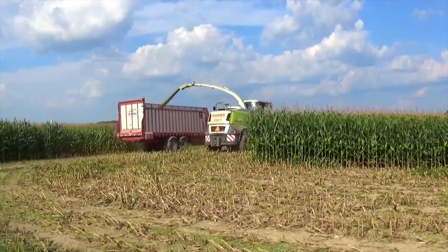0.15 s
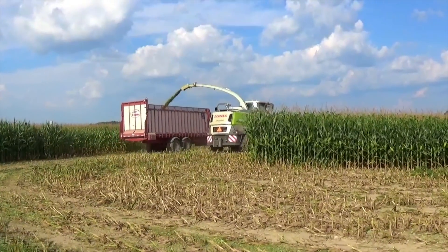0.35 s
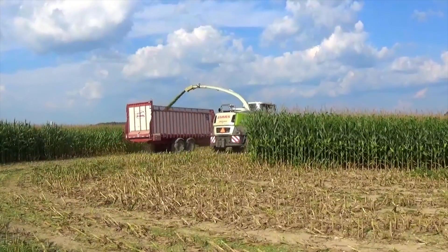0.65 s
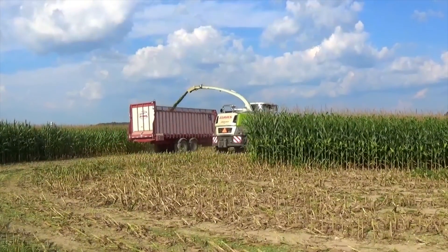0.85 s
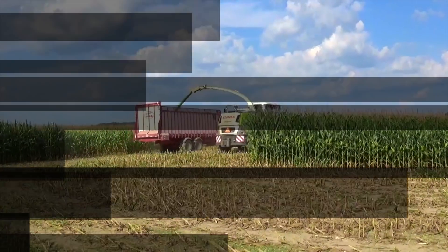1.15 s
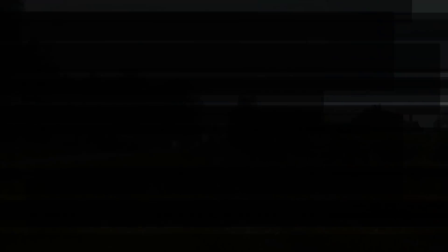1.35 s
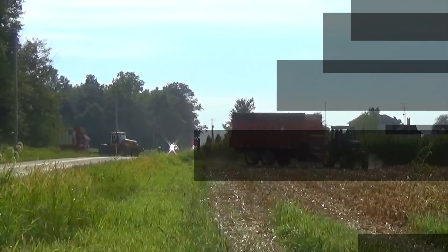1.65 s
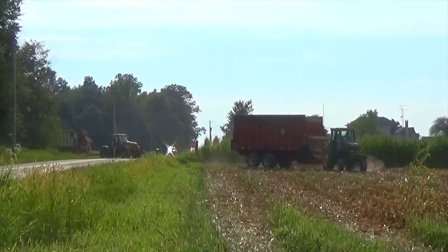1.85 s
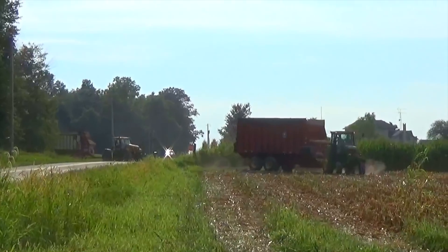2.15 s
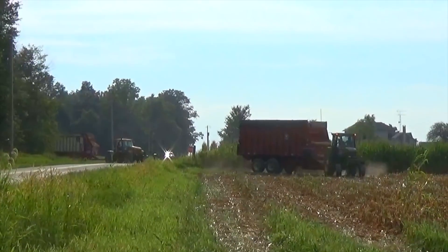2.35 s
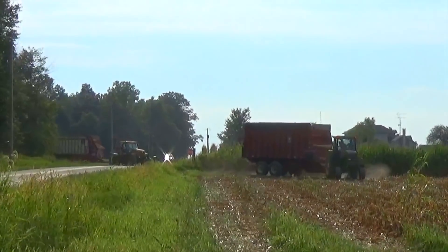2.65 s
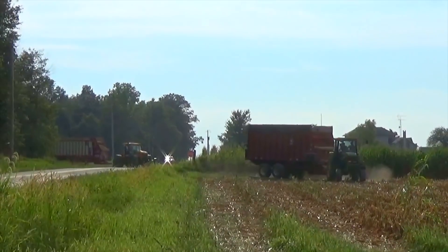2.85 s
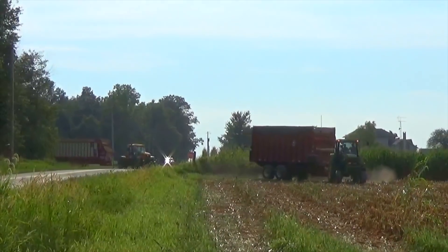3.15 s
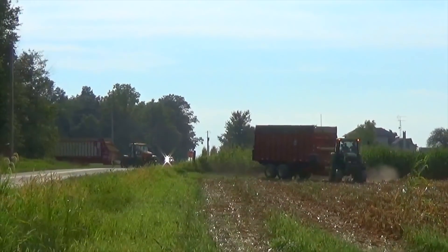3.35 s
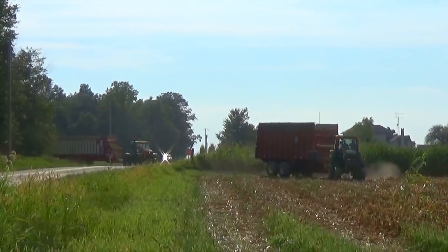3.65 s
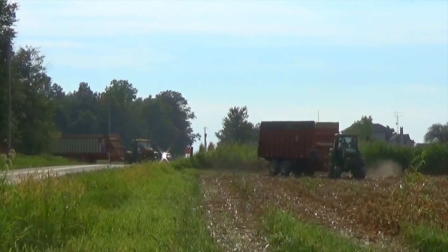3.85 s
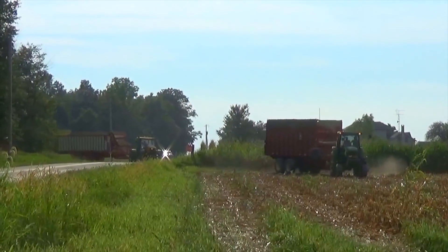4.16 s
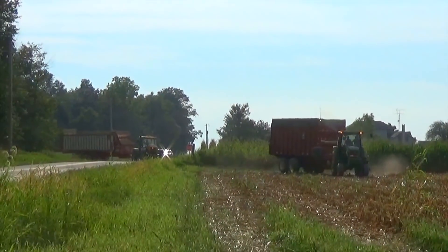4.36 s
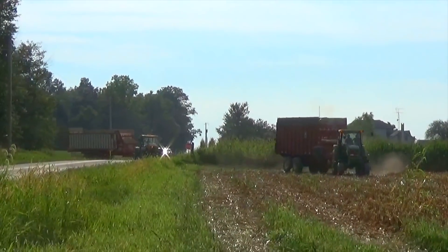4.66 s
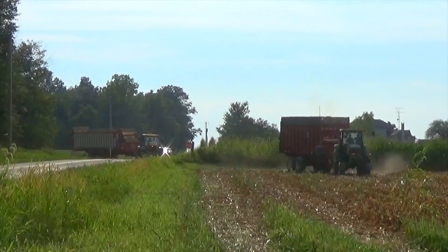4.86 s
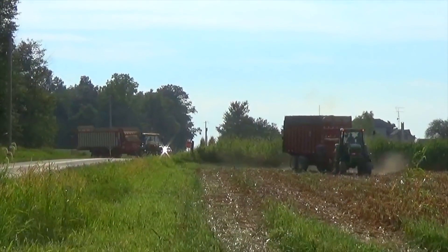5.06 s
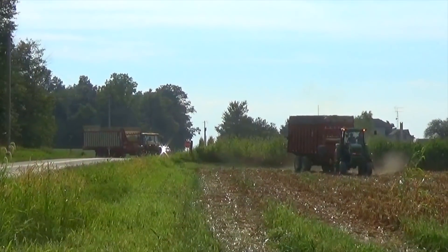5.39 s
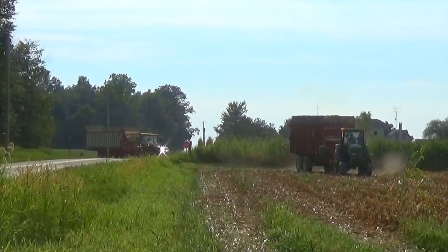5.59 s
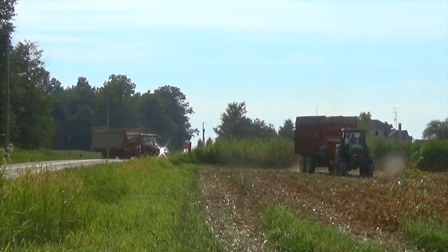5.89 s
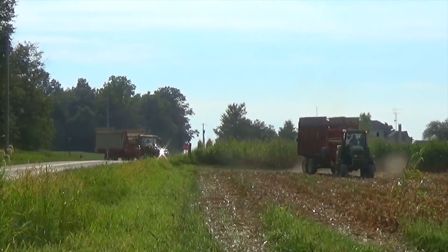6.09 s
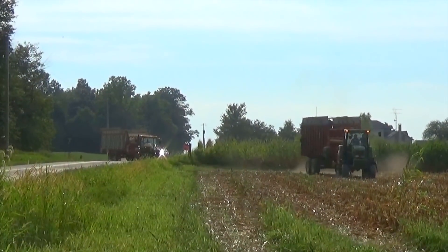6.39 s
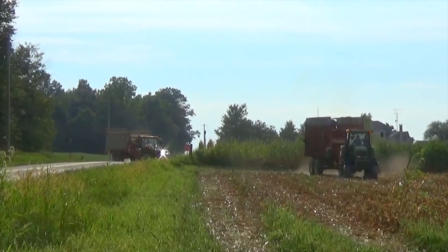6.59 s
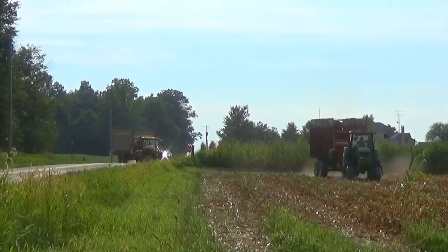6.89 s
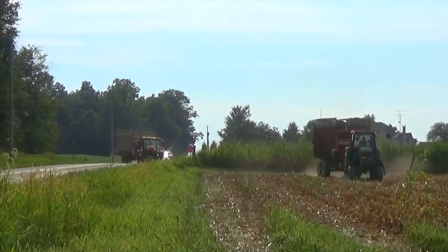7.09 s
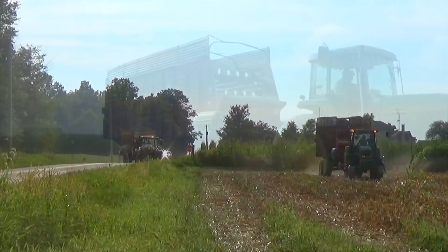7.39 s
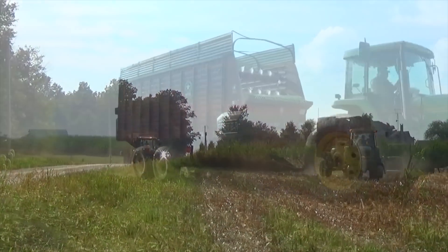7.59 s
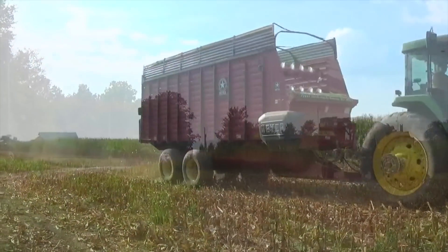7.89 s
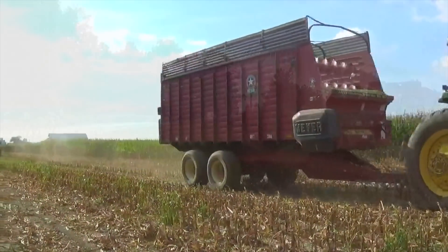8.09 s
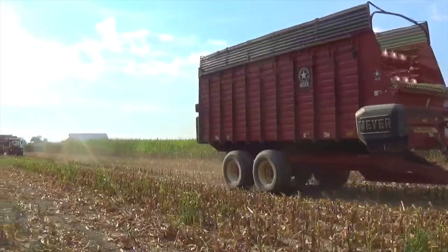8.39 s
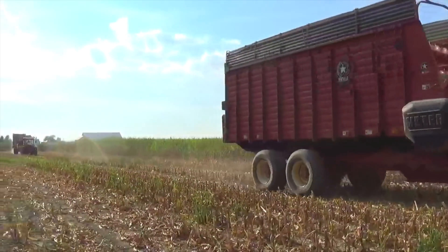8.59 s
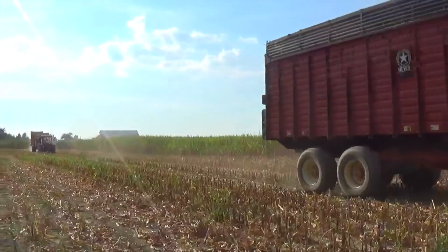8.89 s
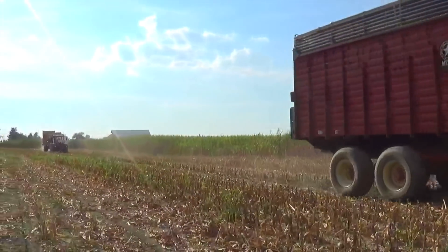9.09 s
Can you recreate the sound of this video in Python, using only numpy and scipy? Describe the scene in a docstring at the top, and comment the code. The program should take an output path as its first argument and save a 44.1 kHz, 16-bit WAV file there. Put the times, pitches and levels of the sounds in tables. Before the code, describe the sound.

From 0 to about 1 s a forage harvester fills the air: a loud, dense drum roar, tonal knife and engine hum, and bright hissing crop. It crossfades until 1.8 s into a much quieter open field with high, continuous insect rasping and low far-off tractor drones. Around 1.9-2.0 s a rapid cluster of hard, sharp clacks sounds close by, followed by tiny squeaks; a faint hollow boom comes at 2.8 s. At 4.1 s a distant tractor opens its throttle, rising for a second with diesel knock, turbo hiss and singing fan, then holding its drone. Wagon rattles tick at 4.6-5.4 and 6.8 s. From 7.5 s a near diesel tractor fades in, passing closest around 8.15 s, leaning right; its hollow exhaust drone then strengthens. Steel rattles at 8.3 s, joints squeak at 8.5 and 9.2 s, and stubble crackles.

```python
"""Corn harvest in three views that fade into each other, with wagons clanking and squeaking along the way.
First a forage harvester: its drum roars, cut crop hisses (both filtered noise) and its engine hums in lines.
From 1 s on, a far field: sharp clacks, insects trilling, droning tractors; at 4 s one opens its throttle.
From 7.5 s on, a tractor passes close by with its wagon, then turns its droning exhaust towards the listener.
Rattles are short bursts of ringing noise; squeaks are short wavering tones."""
import sys
import numpy as np
from scipy import signal
from scipy.fft import rfft, irfft, next_fast_len
from scipy.io import wavfile
from scipy.ndimage import uniform_filter1d, map_coordinates

SR = 44100
rng = np.random.default_rng(int(sys.argv[2]) if len(sys.argv) > 2 else 0)


def unload_audio(sound):
    """Save the sound as a 16-bit wav file, at the path given as the first command line argument."""
    columns = np.transpose(np.atleast_2d(sound))
    # keep every value between -1 and 1, then stretch to whole-number steps
    steps = np.round(np.clip(columns, -1, 1) * 32767)
    wavfile.write(sys.argv[1], SR, steps.astype(np.int16))


N = 407484
T = np.arange(N) / SR  # time in seconds
EDGE_HZ = 11090  # top of the sound band

# colour of the drum's roar: (f/Hz, level/dB)
CHOP_COLOUR = [(40, -44), (90, -19), (135, -10.5), (240, -2.5), (345, -13.5), (520, -12), (600, -9.5),
               (1000, -6), (1260, -11), (1560, -10.5), (2700, -7.5), (3350, -13), (4200, -10.5),
               (6400, -18.5), (11000, -28)]
# resonances of drum housing and spout: (f/Hz, width/Hz, level over the roar/dB)
HOUSING_RESONANCES = [(243, 24, 7), (398, 18, 10), (630, 50, 6), (790, 35, 5), (930, 170, 2), (1380, 50, 5),
                      (1555, 60, 7), (1690, 110, 4), (2335, 110, 6), (2480, 90, -4), (2625, 130, 4),
                      (3900, 250, 4), (5450, 600, 3)]
# colour of the blown crop's hiss: (f/Hz, level/dB)
CROP_COLOUR = [(2000, -22), (3500, -9), (5000, -4), (6500, -3), (8000, -1), (9000, 0), (11000, -3)]
# thick wads of crop leaving the spout: (t/s, bell width/s, extra hiss level/dB)
CROP_WADS = [(.05, 0.32, 4.5), (1.32, 0.11, 4.5), (1.52, 0.22, 3.5)]
# tone of the knives: (multiple of the cutter rate, level/dB)
KNIFE_LINES = [(1, 1.5), (6, -1.5)]
# the harvester's own diesel: (multiple of the firing rate, level/dB)
CHOP_ENGINE_LINES = [(1, -1), (3, -1.5)]
CHOP_DB, CROP_DB, CUTTER_DB = -17, -27, -36  # roar, hiss, knives
CUTTER_HZ, CUTTER_SAG_HZ_PER_S2 = 268, 6.5  # the drum slows ever faster under load
BLOWER_HZ, BLOWER_DB = 245.4, -35  # paddles that throw the crop
CHOP_FIRING_HZ, CHOP_ENGINE_DB = 133, -42


def harvester():
    """The cutter drum roars in its housing while chopped crop hisses through the spout."""
    roar = amp(CHOP_DB) * rush(CHOP_COLOUR, patchy_db=1.35, side_db=-10.0, peaks=HOUSING_RESONANCES)
    crop_db = CROP_DB + swells(CROP_WADS) + 1.1 * drift(40.35)
    crop = amp(crop_db) * rush(CROP_COLOUR, patchy_db=2.5, side_db=-13.0)
    cutter_hz = CUTTER_HZ - CUTTER_SAG_HZ_PER_S2 * T ** 2
    knives = amp(CUTTER_DB) * hum(cutter_hz, KNIFE_LINES, waver=0.00795, flutter_db=4.5)
    blower = amp(BLOWER_DB) * hum(BLOWER_HZ, [(1, 0)], waver=.013, flutter_db=1.5)
    engine = amp(CHOP_ENGINE_DB) * hum(CHOP_FIRING_HZ, CHOP_ENGINE_LINES, waver=0.0084, flutter_db=2.5)
    return roar + crop + knives + blower + engine


# colour of the passing roar: (f/Hz, level/dB)
PASS_COLOUR = [(40, -40), (70, -33), (95, -22), (160, -6), (215, -17.5), (340, -12), (450, -4.5),
               (1050, -3.5), (1350, -5), (2900, -9), (4800, -14), (6500, -22.5), (8500, -24), (11000, -33)]
# ringing panels of tractor and wagon: (f/Hz, width/Hz, level over the roar/dB)
PANEL_RESONANCES = [(602, 67, 6.5), (1010, 35, 3.5), (1072, 44, 7.5), (2530, 34, 5.5), (2850, 85, 6.5),
                    (4600, 490, 3)]
# colour of the exhaust noise: (f/Hz, level/dB)
PIPE_COLOUR = [(100, -34), (250, -10), (370, -13.5), (480, -17), (610, -3), (700, 0.5), (850, -6),
               (1200, -7.5), (1900, -8), (3000, -21), (6000, -42)]
# engine lines heard all round: (multiple of the firing rate, level/dB)
NEAR_LINES = [(0.98, -2), (2, 3.1), (7 / 3, -7)]
# engine lines heard from the front only: (multiple of the firing rate, level/dB)
FRONT_LINES = [(3 / 2, 1), (4, 2.1), (6, 6.2), (9, 9.4), (10, 6)]
# driveline whine: (multiple of the driveline rate, level/dB)
DRIVE_LINES = [(1, -1), (3, 5.5)]
# firing tones that the exhaust pipe reinforces: (multiple of the firing rate, level/dB)
PIPE_LINES = [(3, -9.5), (7, -.5), (8, -13)]
# colour of crackling stubble: (f/Hz, level/dB)
STALK_COLOUR = [(3000, -30), (7000, -8), (8700, -2), (10400, -2.5), (11000, -2.5)]
# cooling air at the tractor's nose: (f/Hz, level/dB)
GRILLE_COLOUR = [(3000, -18), (5000, 4), (6500, -2), (9000, -16)]
# stereo lean of the whole tractor: (f/Hz, left minus right level/dB)
PASS_LEAN = [(60, 0), (190, -1.5), (350, -5), (1100, -7), (2000, -8), (3600, -8), (6500, -7.5),
             (11000, 2.5)]
# levels are before the stereo lean and its overall 0.6 dB cut
PASS_S, PASS_HALF_S, PASS_DB = 8.15, 0.724, -18  # nearest moment, time to half power, roar
FIRING_HZ, DOPPLER_HZ, NEAR_TONES_DB = 100.1, 1.2, -43  # firing rate, its shift in passing, line level
TURN_S, TURN_LENGTH_S = 8.31, 0.43  # the exhaust turns towards the listener
PIPE_DB, PIPE_TONE_DB, PIPE_AHEAD = -20.5, -25, 0.25  # levels once turned; share heard before the turn
DRIVE_PER_FIRING, DRIVE_DB = 1.636, -41
STUBBLE_DB, STUBBLE_DB_PER_S = -34, 2.5  # level at the nearest moment, and its steady rise
GRILLE_S, GRILLE_WIDTH_S, GRILLE_DB = 7.82, 0.35, -29  # when the nose goes by, bell width, peak level


def near_tractor():
    """A diesel passes; its exhaust drone grows as the wagon rolls over crackling stubble."""
    along = (T - PASS_S) / PASS_HALF_S
    nearness = 1 / np.hypot(1, along)
    firing_hz = FIRING_HZ - DOPPLER_HZ * along * nearness
    turned = ramp(TURN_S, TURN_LENGTH_S)
    facing = PIPE_AHEAD + (1 - PIPE_AHEAD) * turned
    firing = np.cos(2 * np.pi * np.cumsum(firing_hz) / SR)

    roar = amp(PASS_DB) * rush(PASS_COLOUR, patchy_db=1.0, side_db=-9.0, peaks=PANEL_RESONANCES)
    roar *= nearness * (1 + 0.13 * firing)  # the roar throbs with the firing
    pipe = amp(PIPE_DB) * facing * rush(PIPE_COLOUR, patchy_db=1.2, side_db=-2.5, peaks=[(695, 90, 2)])

    all_round = hum(firing_hz, NEAR_LINES, waver=.003, flutter_db=1.8)
    front = (1 - turned) * hum(firing_hz, FRONT_LINES, waver=0.00303, flutter_db=1.5)
    tones = amp(NEAR_TONES_DB) * (all_round + front)
    tones += amp(DRIVE_DB) * hum(DRIVE_PER_FIRING * firing_hz, DRIVE_LINES, waver=0.0043, flutter_db=0)
    tones += amp(PIPE_TONE_DB) * facing ** 2 * hum(firing_hz, PIPE_LINES, waver=0.00794, flutter_db=1.5)

    stubble_db = STUBBLE_DB + STUBBLE_DB_PER_S * (T - PASS_S) + 1.41 * drift(250)
    stubble = amp(stubble_db) * rush(STALK_COLOUR, patchy_db=2.5, side_db=-4.5)
    grille = rush(GRILLE_COLOUR, patchy_db=1.0, side_db=-16)
    grille *= swells([(GRILLE_S, GRILLE_WIDTH_S, amp(GRILLE_DB))])
    tractor = roar + pipe + tones + stubble + grille
    return colour(tractor, lambda hz: np.outer([.5, -.5], read(PASS_LEAN, hz)) - .6)


# sharp clacks close by: (t/s, level/dB, ring f/Hz)
CLACK_HITS = [(1.887, -10.5, 2150), (1.9137, -10.5, 2220), (1.916, -10, 2340), (1.9625, -11, 2280),
              (1.9655, -16, 2480), (1.975, -15, 2200), (1.987, -11.5, 1940), (1.9964, -12, 1960),
              (2.002, -18, 2120), (2.018, -20, 2060)]
# colour of their scattered tail: (f/Hz, level/dB)
CLACK_TAIL_COLOUR = [(400, -37), (1100, -2), (1700, 2), (2100, 8), (2900, 7), (3700, -10), (6500, -11),
                     (11000, -31)]


def clacks():
    """Short hard knocks: a few cycles of one resonance, a bright snap and a wide scattered tail."""
    out, t = np.zeros((2, N)), T[:SR // 5]
    for s, db, hz in CLACK_HITS:
        rise = t / 0.0012
        swell = rise ** 2 * np.exp(2 - 2 * rise)
        ring = swell * np.sin(2 * np.pi * hz * t)
        snap = 0.16 * rng.standard_normal(len(t)) * np.exp(-t / 0.006)
        scatter = unit(colour(rng.standard_normal((2, len(t))), lambda f: read(CLACK_TAIL_COLOUR, f)))
        tail = amp(-10.5) * scatter * np.minimum(t / 0.0047, 1) * np.exp(-t / 0.028)
        add(out, s, amp(db) * (ring + snap + tail))
    return out


# wagon rattles: (t/s, level before fading/dB, decay/s, ring f/Hz)
RATTLE_HITS = [(4.626, -24, 0.038, 4170), (4.649, -16.5, 0.019, 3250), (4.848, -27, 0.018, 3000),
               (5.049, -23, 0.019, 1500), (5.393, -24.5, 0.015, 3580), (5.399, -24.5, 0.016, 4550),
               (6.782, -23.5, 0.024, 3130), (6.798, -25, 0.018, 5140), (8.324, -16.5, 0.02, 3180),
               (8.328, -20, 0.016, 9900)]
# colour of loose steel: (f/Hz, level/dB)
STEEL_COLOUR = [(300, -23), (900, 1), (1700, 4), (3500, -0.5), (5200, 0), (7000, -6), (10500, -6.5),
                (13000, -49)]
# squeaks of dry joints: (t/s, length/s, f/Hz, level/dB)
JOINT_SQUEAKS = [(2.058, 0.008, 2930, -25.5), (2.148, 0.013, 5000, -37.5), (2.175, .012, 3250, -35),
                 (2.214, 0.01, 2990, -31), (2.346, .01, 3050, -39), (2.845, .014, 5020, -38),
                 (3.338, .018, 4400, -42), (5.037, .03, 1492, -28.5), (7.727, 0.08, 8020, -30),
                 (8.487, .02, 2970, -30), (8.508, 0.03, 2760, -24), (8.505, .02, 8000, -37),
                 (8.57, .022, 2760, -25.5), (9.202, 0.027, 8000, -30.5)]
RATTLE_ATTACK_S, RATTLE_RING_DB, RATTLE_RING_WIDTH_HZ = 0.0056, 12, 220


def wagons():
    """Loose steel rattles, joints squeak, and an empty box booms once over a rut."""
    out, t = np.zeros(N), T[:SR // 5]
    for s, db, decay, ring_hz in RATTLE_HITS:
        chatter = rng.standard_normal(len(t)) * amp(1.3 * drift(268)[:len(t)])

        def steel_db(hz):
            """Loose steel with one ringing peak."""
            offset = (hz - ring_hz) / RATTLE_RING_WIDTH_HZ
            return read(STEEL_COLOUR, hz) + RATTLE_RING_DB / (1 + offset ** 2)

        ring = unit(colour(chatter, steel_db))
        add(out, s, amp(db) * ring * np.minimum(t / RATTLE_ATTACK_S, 1) * np.exp(-t / decay))
    for s, length, hz, db in JOINT_SQUEAKS:
        u = t[t < length]
        turns = np.cumsum(hz + 55 * drift(305)[:len(u)]) / SR  # the pitch wavers
        tone = np.sqrt(2) * np.sin(2 * np.pi * turns)
        add(out, s, amp(db) * signal.windows.tukey(len(u), .6) * tone)
    boom = sum(np.sin(2 * np.pi * hz * t) for hz in (255, 323, 416, 487))
    add(out, 2.822, amp(-34.5) * boom * np.minimum(t / 0.008, 1) * np.exp(-t / .016))
    return out + amp(-12) * outdoors(out, t60=0.34)


# hard pulls of the hauling engine: (t/s, bell width/s, load 0-1, speed lost as fan f/Hz)
HARD_PULLS = [(2.08, .3, 0.43, 9), (3.93, .24, 0.49, 12), (4.55, .36, 0.97, 0)]
IDLE_HZ, TOP_HZ, DROOP_HZ_PER_S2 = 180, 241, 1.5  # its fan droops as the wagon drags
THROTTLE_S, THROTTLE_OPEN_S, REV_S, REV_EASE = 4.12, 0.16, 0.99, 1.4


def fan_speed():
    """Blade rate of the hauling tractor's fan (Hz): idle, rev-up, slow droop."""
    revs = 1 - (1 - ramp(THROTTLE_S, REV_S)) ** REV_EASE
    droop = DROOP_HZ_PER_S2 * np.maximum(T - THROTTLE_S - REV_S, 0) ** 2
    return IDLE_HZ + (TOP_HZ - IDLE_HZ) * revs - droop - swells(HARD_PULLS, axis=3)


# colour of the far idling engines: (f/Hz, level/dB)
FIELD_COLOUR = [(40, -33), (70, -17), (100, -23), (190, -8), (250, -19), (400, -11.5), (520, -6), (950, -6),
                (2100, -7.5), (2700, -5), (3450, -12), (4100, -8.5), (4900, -13), (6200, -19.5),
                (11000, -31)]
# colour of the hauling engine's roar: (f/Hz, level/dB)
HAUL_COLOUR = [(50, -45), (130, -18.5), (220, -11), (340, -18), (480, -7.5), (700, -5), (880, -5),
               (1150, 0.5), (1450, -2.5), (2700, -3.5), (4500, -9), (6500, -15), (11000, -25)]
# colour of diesel knock: (f/Hz, level/dB)
KNOCK_SPECTRUM = [(800, -20), (1600, 0), (2500, 0), (3500, 10), (5500, -12), (8000, -11), (11000, -10)]
# lines added by a labouring engine: (multiple of the firing rate, level/dB)
LOAD_LINES = [(2, 2), (3, -7)]
# lines of the hauling tractor's fan: (multiple of the blade rate, level/dB)
FAN_LINES = [(1, -0.5), (2, 4.5), (3, 6.5), (4, -10), (5, -2), (6, -12), (7, 2.5)]
FAN_PER_FIRING, FAN_SLIP_PER_S = 2.37, .025  # fan blades per firing; the drive slips more and more
FIELD_DB, IDLE_YIELD_DB = -36.5, -2  # far wash of idling engines, its change as the throttle opens
HAUL_DB, HAUL_THROTTLE_DB, HAUL_LOAD_DB = -40, 11, 1  # roar, and what throttle and full load add
TURBO_HZ, TURBO_LOAD_HZ = 2788, 430  # the turbo spools up with load
TURBO_DB, TURBO_LOAD_DB = -43.5, 12  # before its lean to the right
FIRING_DB, FIRING_LOAD_DB, LABOUR_DB = -57.5, 8.5, -50.5  # exhaust, added by load, full-load overtones
FAN_DB, WHINE_DB, SPEED_POWER = -48.6, -50.5, 4.1  # at top speed; both grow as a power of speed
KNOCK_DB, KNOCK_PEAK_S, KNOCK_WIDTH_S = -37, 4.28, .2  # knock while it accelerates
# the ground reflection cancels far tones here
GROUND_DIP_HZ, GROUND_DIP_WIDTH_HZ, GROUND_DIP_DB = 358, 69, -13.5


def ground_dip(hz):
    """Sound bounced off the ground weakens one band of the direct sound (dB)."""
    return GROUND_DIP_DB / (1 + ((hz - GROUND_DIP_HZ) / GROUND_DIP_WIDTH_HZ) ** 4)


def far_tractors():
    """Engines drone across the field; one revs up with diesel knock, a hissing turbo and a singing fan."""
    throttle, load, fan_hz = ramp(THROTTLE_S, THROTTLE_OPEN_S), swells(HARD_PULLS), fan_speed()
    firing_hz = fan_hz / (FAN_PER_FIRING - FAN_SLIP_PER_S * T)
    since_firing = np.cumsum(firing_hz) / SR % 1  # share of the firing cycle gone by

    field_peaks = [(604, 40, 2.6), (724, 79, 2.8), (1140, 160, 4.7)]
    air = rush(FIELD_COLOUR, patchy_db=2.1, side_db=-13.0, peaks=field_peaks)
    air *= amp(FIELD_DB + IDLE_YIELD_DB * throttle + HAUL_LOAD_DB * load)
    roar = rush(HAUL_COLOUR, patchy_db=1.0, side_db=-13.5)
    roar *= amp(HAUL_DB + HAUL_THROTTLE_DB * throttle + HAUL_LOAD_DB * load)

    knock = rush(KNOCK_SPECTRUM, patchy_db=3, side_db=-12)
    knock = unit(knock * np.exp(-since_firing / 0.2) * amp(1.2 * drift(80)))
    knock *= swells([(KNOCK_PEAK_S, KNOCK_WIDTH_S, amp(KNOCK_DB))])

    # slow noise moved up to the turbo's pitch becomes a narrow hiss
    turbo_turns = np.cumsum(TURBO_HZ + TURBO_LOAD_HZ * load) / SR
    turbo = ((drift(650) + 1j * drift(650)) * np.exp(2j * np.pi * turbo_turns)).real
    puffs = 1 + 0.61 * np.cos(2 * np.pi * since_firing)  # each exhaust stroke kicks the turbine
    turbo = unit(turbo * puffs * amp(2.0 * drift(60)))
    turbo = turbo * amp(TURBO_DB + TURBO_LOAD_DB * load) * amp([[-1.8], [1.2]])  # left, right

    speed_gain = (fan_hz / TOP_HZ) ** SPEED_POWER
    exhaust = amp(FIRING_DB + FIRING_LOAD_DB * load) * hum(firing_hz, [(0.99, 0)], waver=0.004, flutter_db=-1.2)
    exhaust += amp(LABOUR_DB) * load * hum(firing_hz, LOAD_LINES, waver=.012, flutter_db=2.5)
    whine = hum(1.5 * firing_hz, [(0.98, 0)], waver=0.0022, flutter_db=0.8)
    whine *= amp(WHINE_DB) * speed_gain ** 2
    fan = amp(FAN_DB) * speed_gain * hum(fan_hz, FAN_LINES, waver=0.0016, flutter_db=0.95)
    engines = colour(exhaust + whine + fan + road_tractor(), ground_dip)
    return air + roar + knock + turbo + engines


# brief slowings on the road: (t/s, bell width/s, firing f lost/Hz)
ROAD_SLOWINGS = [(1.7, .45, 6), (2.88, 0.24, 7.2), (4.08, 0.44, 8), (6.62, .5, 10.4)]
# lines of the road tractor: (multiple of the firing rate, level/dB)
ROAD_LINES = [(1, -6), (2, 0), (3, -13), (7, -4.5), (10, -1.5)]
ROAD_HZ, ROAD_DB, ROAD_DB_PER_HZ = 77.9, -55, .5  # cruising rate and level; louder per Hz lost
PULL_AWAY_S, PULL_AWAY_HZ, PULL_AWAY_DB = 6.9, 3.94, 9.5  # it finally speeds up: rise in rate and level


def road_tractor():
    """A far engine on the road drones louder whenever it labours."""
    sag, away = swells(ROAD_SLOWINGS), ramp(PULL_AWAY_S, 0.96)
    gain = amp(ROAD_DB + ROAD_DB_PER_HZ * sag + PULL_AWAY_DB * ramp(PULL_AWAY_S, 0.46))
    return gain * hum(ROAD_HZ - sag + PULL_AWAY_HZ * away, ROAD_LINES, waver=0.00468, flutter_db=2.0)


# colour of a ringing cricket wing: (f/Hz, level/dB)
WING_COLOUR = [(6300, -36), (7100, -14.5), (7450, -8), (7780, -1.5), (8000, -13), (8350, -11.5),
               (8750, -17), (9600, -29)]


def insects():
    """A bush cricket rasps in uneven wing strokes, its pitch swaying up and down; another trills, each stroke
    an arch in pitch."""
    wing = 2 * np.pi * np.cumsum(27.1 * (1 + 0.0148 * drift(5.9))) / SR
    depths = (0.15, 0.18, 0.18, 0.087, 0.13)
    strokes = 1 + sum(depth * np.cos(k * wing + k * k) for k, depth in enumerate(depths, start=1))
    sweep = np.exp(-2j * np.pi * np.cumsum(190 * np.sin(3 * wing + 9)) / SR)  # slides the pitch
    rasp = (signal.hilbert(rush(WING_COLOUR, patchy_db=-0.5, side_db=-7.5)) * sweep).real

    stroke = np.cumsum(63.4 * (1 + 0.0039 * drift(7.5))) / SR % 1
    arch = np.sin(np.pi * stroke)
    trill_hz = 8850 + 380 * arch + 80 * drift(700)
    trill = arch * np.sin(2 * np.pi * np.cumsum(trill_hz) / SR)
    return amp(-38) * unit(rasp * strokes) + amp(-54) * unit(trill)


def outdoors(x, t60):
    """Diffuse scatter from ground, crop and trees, different at each ear."""
    t = T[:SR // 2]
    tail = rng.standard_normal((2, len(t))) * amp(-60 * t / t60) * (t > .003)
    return signal.oaconvolve(x[None], tail / np.linalg.norm(tail[0]), axes=1)[:, :N]


def rush(spectrum, patchy_db, side_db, peaks=()):
    """Turbulent stereo noise with resonances and short random patches; side_db sets its width."""
    frames, hz = N // 512 + 5, np.fft.rfftfreq(2048, 1 / SR)
    a, b, c, d, patches = rng.standard_normal((5, frames, len(hz)))
    patches = uniform_filter1d(patches, size=7, axis=0)  # smooth in time
    patches = unit(uniform_filter1d(patches, size=12, axis=1))  # smooth in frequency
    shape_db = read(spectrum, hz)
    shape_db = shape_db + sum(db / (1 + (2 * (hz - f) / width) ** 2) for f, width, db in peaks)
    mid, side = a + 1j * b, amp(side_db) * (c + 1j * d)
    z = np.array([mid + side, mid - side]) * amp(shape_db + patchy_db * patches) * (hz < EDGE_HZ)
    return unit(signal.istft(z.swapaxes(1, 2), nperseg=2048, noverlap=1536)[1][:, :N])


def hum(hz, orders, waver, flutter_db):
    """Lines of a turning machine; moving air makes each swell and fade on its own."""
    turns = np.cumsum(hz * (1 + waver * drift(18))) / SR
    total = 0
    for multiple, db in orders:
        gain = amp(db + flutter_db * drift(11))
        total = total + gain * np.sin(2 * np.pi * (multiple * turns + rng.random()))
    return np.sqrt(2) * total


def drift(rate):
    """Smooth, bounded chance of rms 1, changing about rate times a second."""
    knots = np.tanh(rng.standard_normal(12000))
    places = np.minimum(T[::16] * rate, len(knots) - 1)
    return unit(map_coordinates(knots, [places], order=2)).repeat(16)[:N]


def ramp(start, length):
    """Rises in a straight line from 0 to 1."""
    return np.clip((T - start) / length, 0, 1)


def swells(rows, axis=2):
    """Sum of bell curves from rows (t/s, bell width/s, ..), their heights in column axis."""
    return sum(row[axis] * np.exp(-((T - row[0]) / row[1]) ** 2) for row in rows)


def colour(x, gain_db):
    """Filters by a rule that gives dB for each frequency."""
    size = next_fast_len(x.shape[-1] + 2048)
    gain = amp(gain_db(np.fft.rfftfreq(size, 1 / SR)))
    return irfft(rfft(x, size) * gain, size)[..., :x.shape[-1]]


def read(points, hz):
    """Reads a spectrum table on a log-frequency axis."""
    f, value = np.transpose(points)
    return np.interp(np.log(hz + 1), np.log(f), value)


def add(mix, s, sound):
    """Mixes a sound in at time s."""
    part = mix[..., round(s * SR):][..., :sound.shape[-1]]
    part += sound[..., :part.shape[-1]]


def amp(db):
    """Decibels to gain."""
    return 10 ** (np.asarray(db) / 20)


def unit(x):
    """Scales to rms 1."""
    return x / np.sqrt(np.mean(x ** 2) + 1e-20)


TO_FIELD_S, TO_WAGON_S, FADE_S = 1.07, 7.48, 0.71  # start of each cross-fade, and its length


def scene():
    """The harvester fades into the far field, and the field into the passing wagon."""
    to_field, to_wagon = ramp(TO_FIELD_S, FADE_S), ramp(TO_WAGON_S, FADE_S)
    field = (far_tractors() + insects()) * to_field * (1 - to_wagon)
    return harvester() * (1 - to_field) + field + near_tractor() * to_wagon + clacks() + wagons()


def record(dry):
    """A steep low-pass filter removes everything above the top of the sound band."""
    low_pass = signal.firwin(1023, EDGE_HZ, window=("kaiser", 9), fs=SR)
    return signal.oaconvolve(dry, low_pass[None], "same")


dry = scene()
out = record(dry)
unload_audio(out)
```